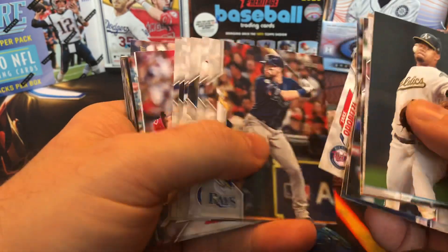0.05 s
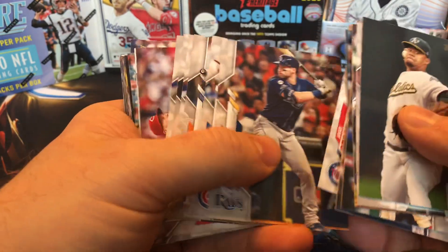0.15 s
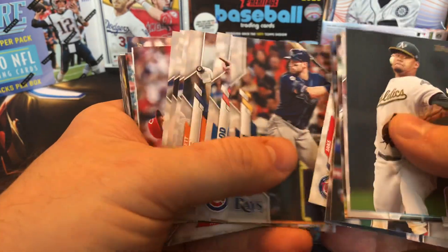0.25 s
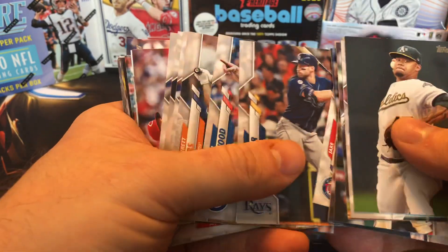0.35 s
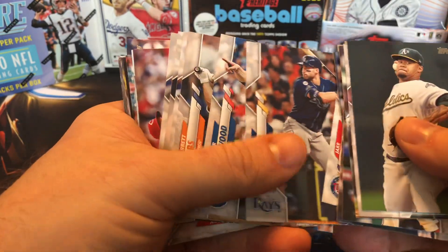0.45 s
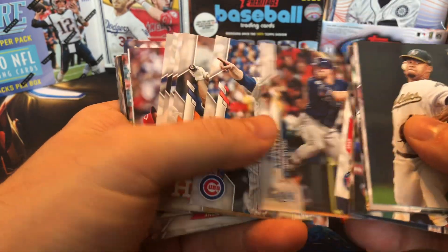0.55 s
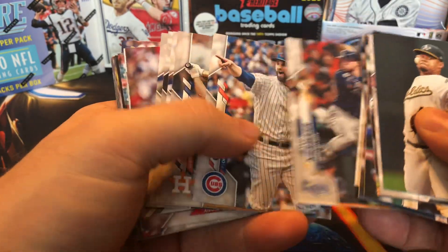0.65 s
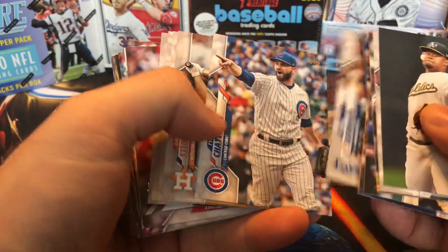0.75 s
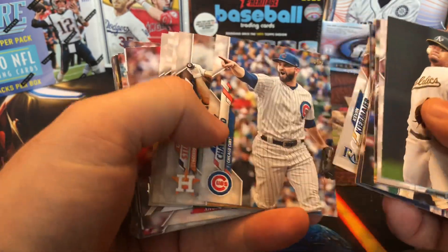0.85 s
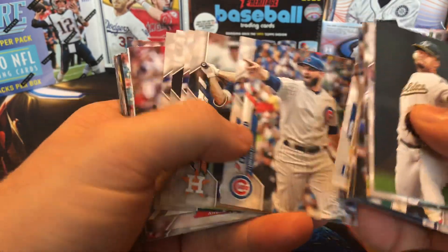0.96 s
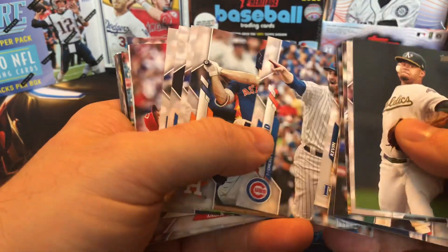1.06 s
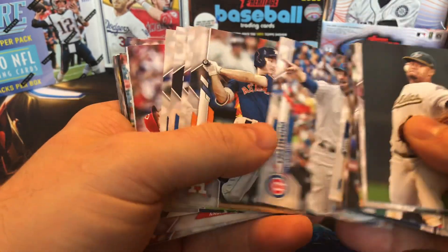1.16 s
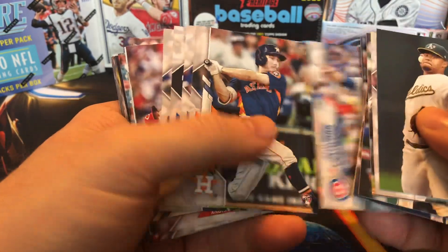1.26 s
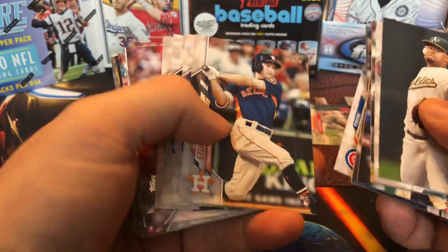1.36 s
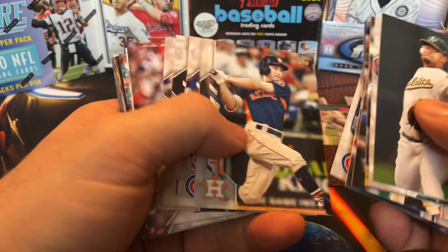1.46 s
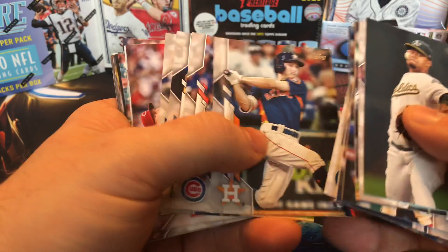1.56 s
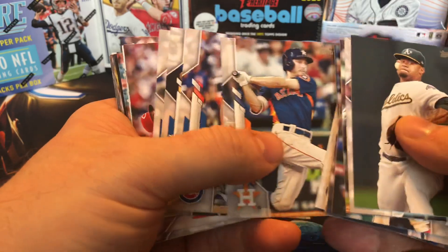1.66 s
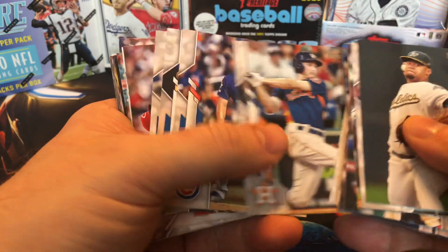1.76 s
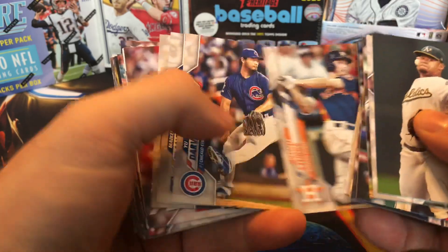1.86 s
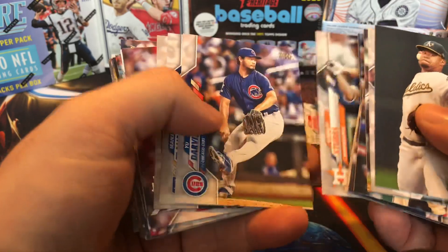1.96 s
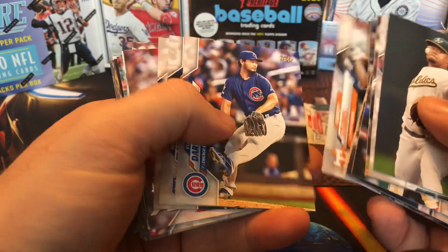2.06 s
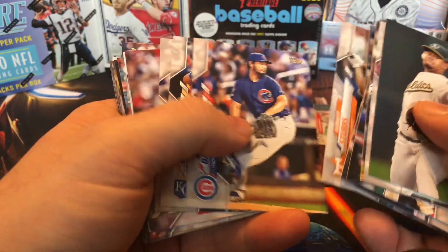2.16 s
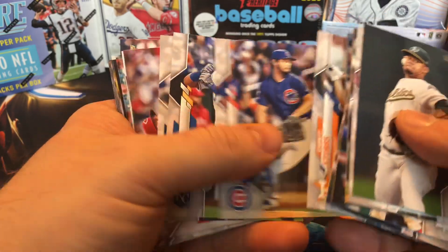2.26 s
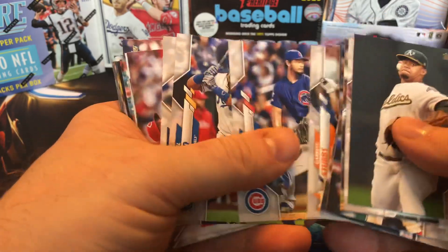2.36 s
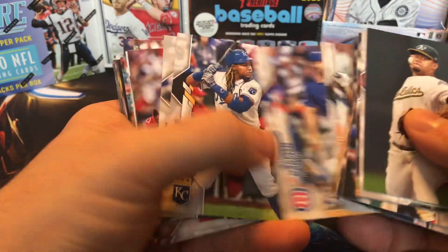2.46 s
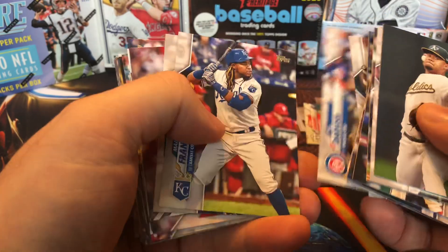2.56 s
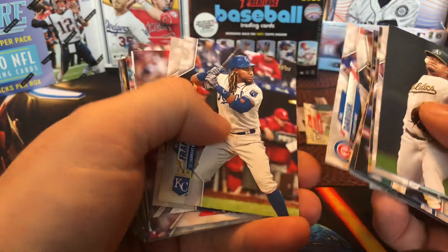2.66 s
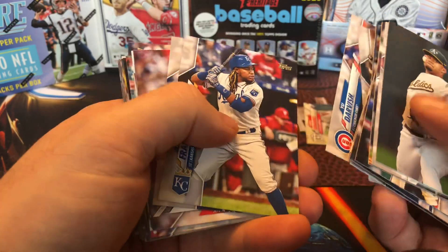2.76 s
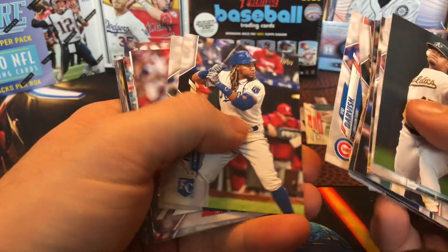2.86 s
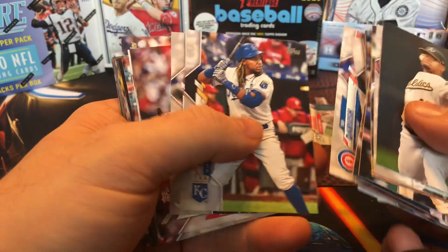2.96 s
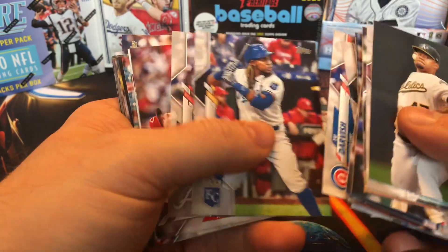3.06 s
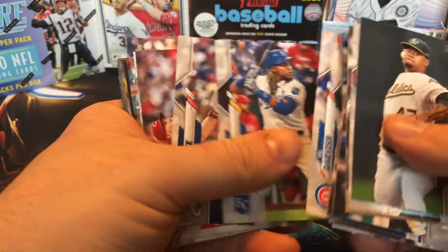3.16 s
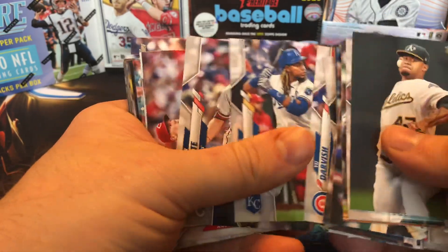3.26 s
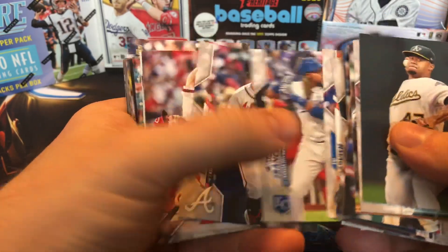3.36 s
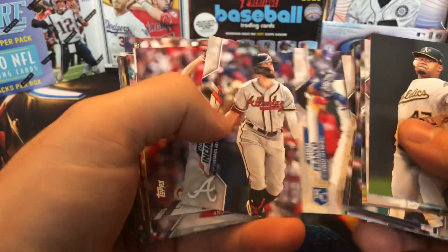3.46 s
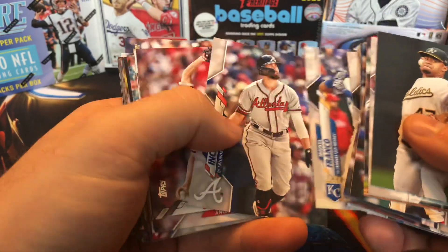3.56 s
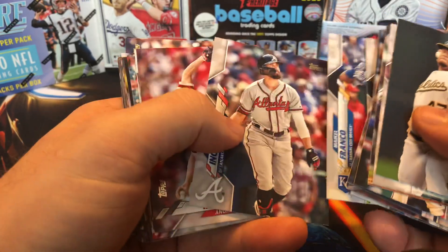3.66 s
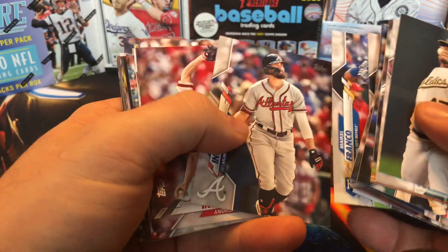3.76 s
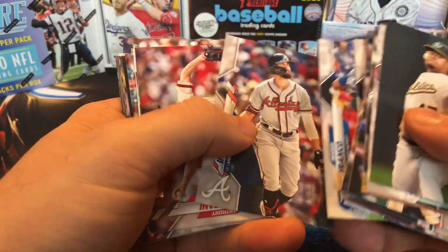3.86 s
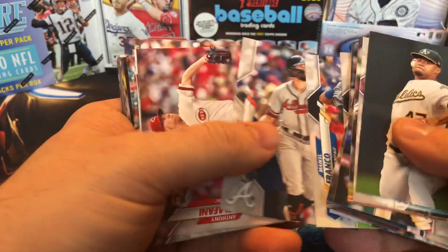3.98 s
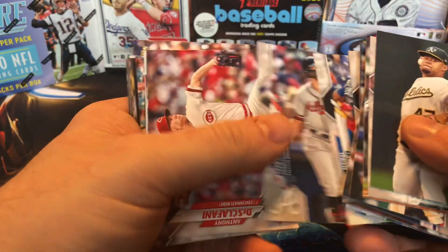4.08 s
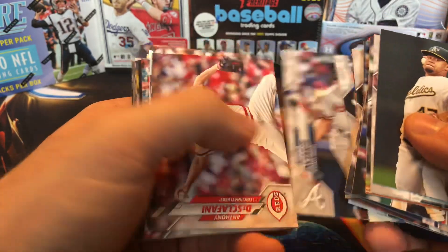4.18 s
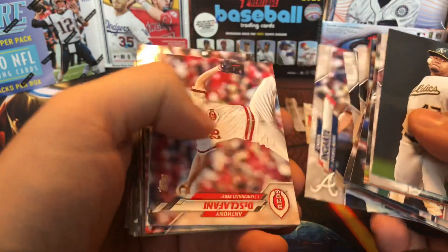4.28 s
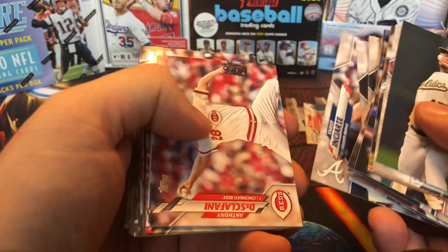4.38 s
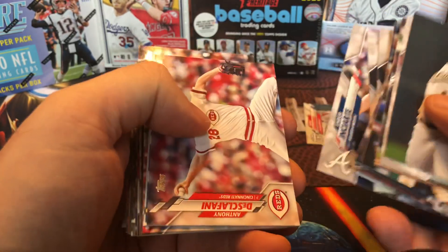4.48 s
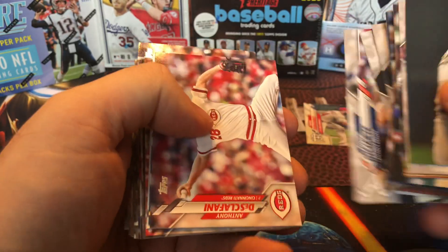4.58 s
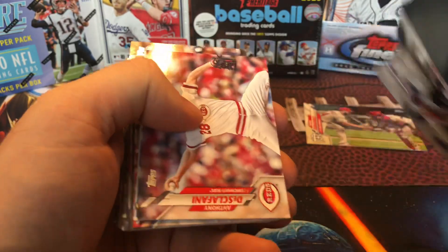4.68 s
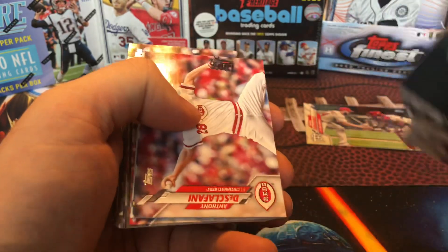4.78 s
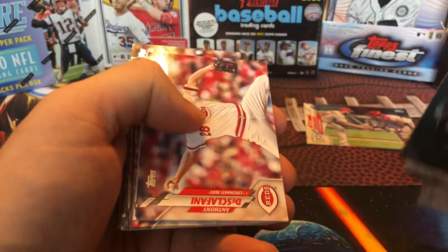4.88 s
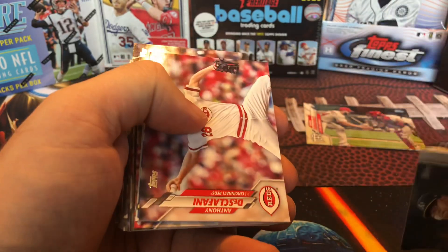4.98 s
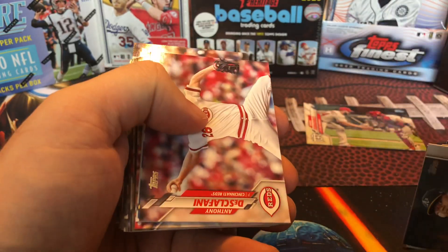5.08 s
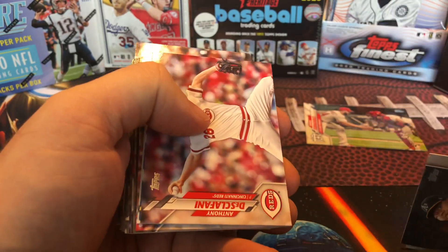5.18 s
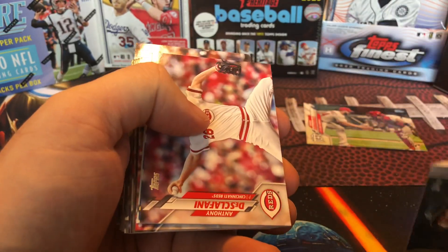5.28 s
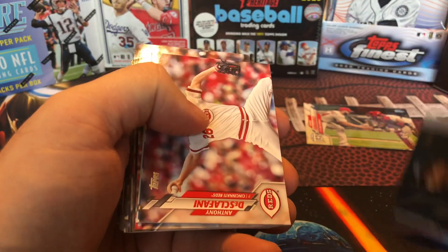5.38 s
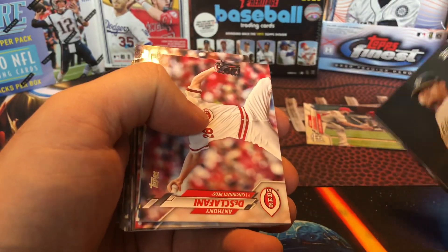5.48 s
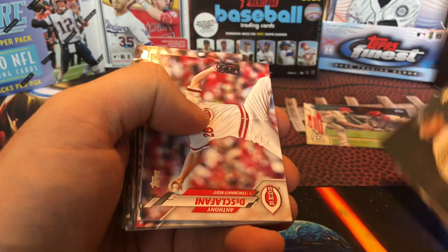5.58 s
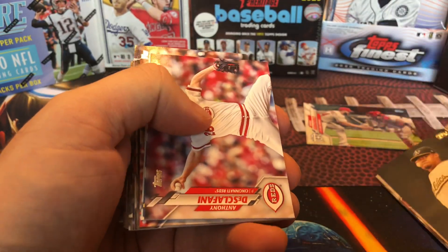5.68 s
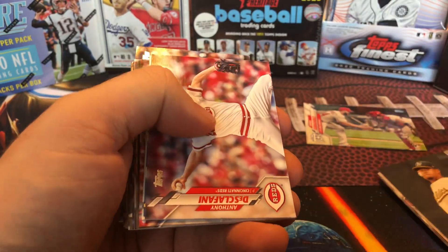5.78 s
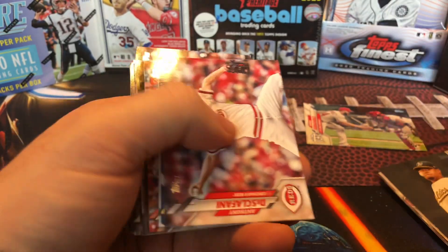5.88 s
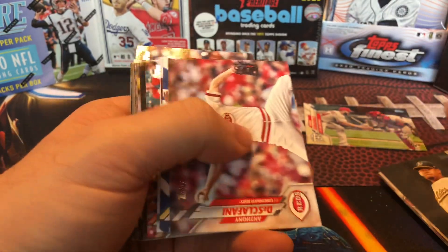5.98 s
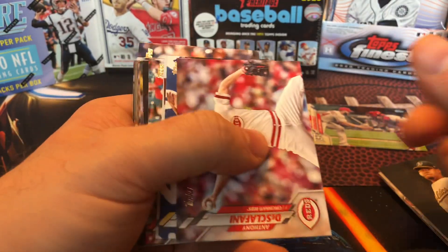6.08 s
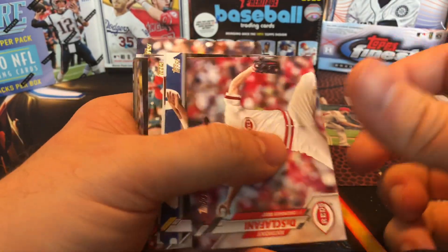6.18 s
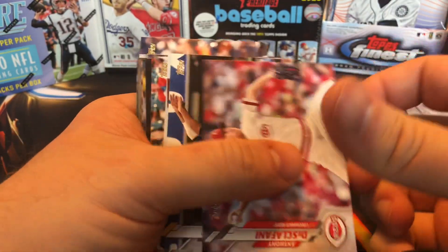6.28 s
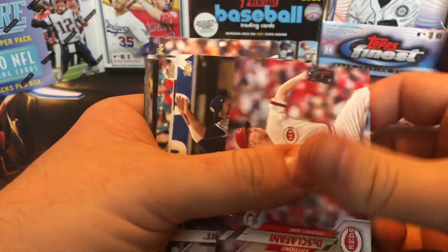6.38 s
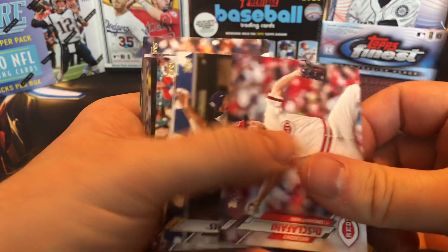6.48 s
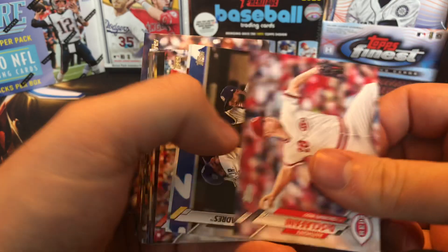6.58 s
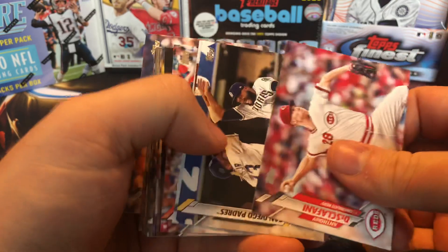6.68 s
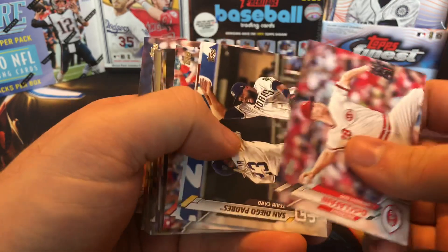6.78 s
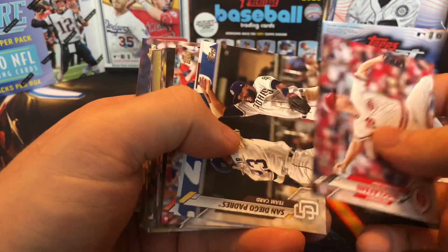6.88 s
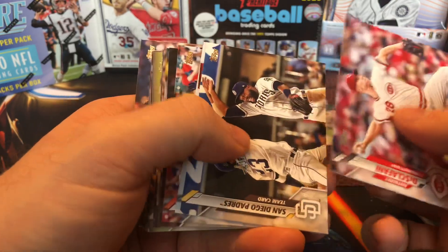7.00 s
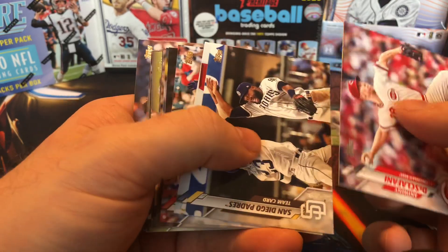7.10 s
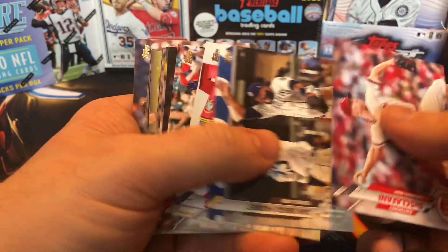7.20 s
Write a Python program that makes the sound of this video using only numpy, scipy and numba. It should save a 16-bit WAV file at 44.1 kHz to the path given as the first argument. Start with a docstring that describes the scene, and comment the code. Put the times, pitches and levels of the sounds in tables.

```python
"""In a quiet room, a stack of stiff glossy cards is thumbed from hand to hand close to a microphone.
Faces slide with a fine hiss and edges scrape: friction noise through band-passes and resonances.
Edges snap free as short noise bursts with a knock, and rubbed gaps whistle as narrow noise bands.
A bundle is laid down and slapped on the table: a falling chirp, a crack and ringing modes.
The walls answer with decaying noise tails; a fan-like hum of noise and tones fills the room."""
import sys
import numpy as np
from scipy import signal
from scipy.fft import rfft, irfft, next_fast_len
from scipy.io import wavfile
from numba import njit

SR = 44100
rng = np.random.default_rng(int(sys.argv[2]) if len(sys.argv) > 2 else 0)


def transcribe(u):
    """Save the signal u as a 16-bit wav file named by the first command-line argument.

    u: samples, shape (n,) or (channels, n), limited to [-1, 1]; the rate is SR.
    q: integer samples, one column per channel.
    """
    v = np.clip(np.atleast_2d(u).T, -1, 1)
    q = np.round(v * 32767).astype(np.int16)
    wavfile.write(sys.argv[1], SR, q)


N = 319284   # length [samples]


def amp(db):
    """Decibel law: amplitude gain of a level in dB."""
    return 10 ** (np.asarray(db) / 20)


def unit(x):
    """Normalisation by energy: scaled to rms 1."""
    return x / np.sqrt(np.mean(x ** 2) + 1e-20)


def peak_one(x):
    """Normalisation by peak: scaled to height 1."""
    return x / np.max(np.abs(x))


def add(out, start_s, sound):
    """Superposition: mixes a sound in at its start time."""
    i = round(start_s * SR)
    out[i:i + len(sound)] += sound[:N - i]


def coloured(x, spectrum):
    """Linear filtering: a gain curve read on a log-frequency axis shapes the spectrum."""
    hz, db = np.transpose(spectrum)
    size = next_fast_len(N)
    log_hz = np.log(np.maximum(np.arange(size // 2 + 1) * SR / size, 1))
    gain = amp(np.interp(log_hz, np.log(hz), db))
    return irfft(rfft(x, size) * gain, size)[:N]


def resonance(x, hz, width_hz):
    """Damped resonance: a two-pole peak of gain 1."""
    r = np.exp(-np.pi * width_hz / SR)
    zeros = [(1 - r * r) / 2, 0, (r * r - 1) / 2]
    poles = [1, -2 * r * np.cos(2 * np.pi * hz / SR), r * r]
    return signal.lfilter(zeros, poles, x)


@njit
def moving_peak(x, hz, damping, sr):
    """Variable resonance: a state-variable band-pass whose centre moves."""
    out, low, band = np.zeros(len(x)), 0., 0.
    for i in range(len(x)):
        g = np.tan(np.pi * hz[i] / sr)
        high = (x[i] - (g + damping) * band - low) / (1 + g * (g + damping))
        mid = g * high + band
        band = g * high + mid
        low += 2 * g * mid
        out[i] = damping * mid
    return out


def drift(rate_hz):
    """Random fluctuation: twice low-passed noise of rms 1."""
    r = np.exp(-2 * np.pi * rate_hz / SR)
    return unit(signal.lfilter([1], [1, -2 * r, r * r], rng.standard_normal(N + SR))[SR:])


def treble(x):
    """High-pass filtering: what lies above the card's own colour."""
    return signal.sosfilt(signal.butter(2, 7500, "high", fs=SR, output="sos"), x)


def low_pass(x, hz):
    """First-order roll-off: softens a sound above the given frequency."""
    return signal.lfilter(*signal.butter(1, hz, fs=SR), x)


def snap(noise, decay_ms, rise_ms):
    """Sudden release: noise that bursts at once and dies exponentially."""
    ms = 1000 * np.arange(len(noise)) / SR
    return noise * (1 - np.exp(-ms / rise_ms)) * np.exp(-ms / decay_ms)


def reach(hz, centre_hz, db_per_octave):
    """Modal excitation: a contact drives most the modes near its own pitch."""
    return amp(-db_per_octave * abs(np.log2(hz / centre_hz)))


# room noise: (frequency [Hz], relative level [dB per Hz])
AIR_SPECTRUM = [(25, -34), (48, -17), (84, -17), (112, -15.5), (140, -8), (190, -10), (290, -6.5),
                (430, -15), (677, -17), (840, -22.5), (1160, -18.5), (1450, -22.5), (1700, -30.5),
                (2500, -32), (4250, -38), (16000, -49)]
AIR_DB = -54   # rms
# wavering tones and room resonances: (frequency [Hz], width [Hz], rms level [dB])
FAN_TONES = [(53.3, 1.6, -85), (100, 2.5, -70.5), (141.6, 18, -63.5), (174.3, 31, -60.5),
             (211.3, 22.5, -57.5), (218.2, 4.3, -55), (257, 39, -63.5), (361, 1.7, -67), (345, 30, -63),
             (400, 2.9, -67.5), (417, 2, -66.5), (1126, 0.41, -70.5)]
# motor tones: (frequency [Hz], rms level [dB])
MOTOR_TONES = [(59.5, -70), (119.8, -58.5)]


def hum(patchy_db=0.5, waver_db=0.5):
    """Broadband and tonal noise: air noise, a motor's tones and narrow noise bands that waver as a fan."""
    air_noise = unit(coloured(rng.standard_normal(N), AIR_SPECTRUM))
    out = amp(AIR_DB + patchy_db * drift(43.0)) * air_noise
    for hz, width_hz, db in FAN_TONES:
        white = rng.standard_normal(N + SR)   # the first second lets the resonance settle
        band = resonance(resonance(white, hz, width_hz), hz, width_hz)
        out += amp(db) * unit(band[SR:])
    t = np.arange(N) / SR
    for hz, db in MOTOR_TONES:
        out += amp(db + waver_db * drift(1.2)) * np.sqrt(2) * np.sin(2 * np.pi * hz * t)
    return out


# colour given to the rubbing noise: (frequency [Hz], gain [dB])
RUB_COLOUR = [(500, 14.5), (900, 8), (1500, 9), (2500, 7.5), (4300, 6.5), (6300, 7.5), (9000, -1),
              (16000, -7.5)]
CATCHES_PER_S, CATCH_DB = 200, -5   # tiny ticks as grit catches, over the rub


def friction(grain_db, patchy_db, patch_rate_hz):
    """Stick-slip friction: surface noise through many small gaps, each opening and closing by itself."""
    catches = (rng.random(N) < CATCHES_PER_S / SR) * amp(CATCH_DB + 2.9 * rng.standard_normal(N))
    held = np.exp(-2 / (SR / 1000))   # each catch dies with a time constant of 0.5 ms
    roughness = amp(grain_db * drift(150.0)) + signal.lfilter([1], [1, -held], catches)
    white = rng.standard_normal((2, N)) * roughness
    out = np.zeros(N)
    for k, hz in enumerate(np.geomspace(600, 15500, 32)):
        out += amp(patchy_db * drift(patch_rate_hz)) * resonance(white[k % 2], hz, 0.11 * hz)
    return coloured(out, RUB_COLOUR)


# a card face is pushed across its neighbour:
# (time of top speed [s], rise [s], fall [s], rub level [dB], centre [Hz], gloss hiss level [dB])
PUSHES = [(0.02, 0.11, 0.19, -62, 4170, -69), (0.24, 0.063, 0.18, -61.5, 3630, -75),
          (0.59, 0.29, 0.12, -60.5, 3300, -68), (0.76, 0.13, 0.24, -58.5, 3760, -64),
          (1.03, 0.13, 0.58, -60.5, 4630, -65), (1.25, 0.12, 0.23, -52.5, 3060, -59),
          (1.4, .05, 0.17, -77, 2800, -112), (1.553, 0.035, 0.053, -57.5, 3700, -67),
          (1.81, 0.26, 0.34, -58.5, 3340, -66), (1.96, 0.082, 0.087, -58, 3600, -65),
          (2.085, 0.017, 0.017, -59, 5000, -72), (2.28, 0.36, 0.36, -61, 4530, -61),
          (2.46, 0.14, 0.25, -56.5, 3980, -61.5), (2.595, 0.034, 0.06, -61, 4000, -60),
          (2.71, 0.071, 0.022, -63, 3000, -70), (2.93, 0.14, 0.2, -59.5, 3900, -79),
          (3.12, 0.057, 0.24, -62, 5030, -64), (3.3, 0.36, 0.35, -57.5, 4460, -61),
          (3.48, 0.09, 0.11, -50, 2490, -57.5), (3.79, 0.098, 0.12, -64, 4500, -61),
          (3.99, 0.2, 0.17, -57, 3200, -63), (4.129, 0.11, 0.056, -47, 4500, -54),
          (4.166, 0.05, 0.054, -45.5, 2450, -56), (4.26, 0.057, 0.046, -51.5, 3850, -56),
          (4.55, 0.074, 0.27, -66, 3300, -76), (4.675, .04, 0.063, -61, 4200, -70),
          (4.77, 0.091, 0.086, -55, 6370, -57.5), (4.847, 0.03, 0.038, -54.5, 4530, -56),
          (5.39, .03, 0.13, -60, 4000, -68), (5.03, 0.089, 0.071, -50.5, 3780, -54),
          (5.17, 0.033, 0.16, -59.5, 4000, -64), (5.265, 0.045, 0.079, -51.5, 3170, -58),
          (5.6, .05, .06, -64, 6000, -66), (5.346, 0.08, 0.065, -42, 2980, -48),
          (5.53, 0.032, 0.1, -63, 4400, -61), (5.729, 0.13, 0.48, -54.5, 4530, -58.5),
          (6.165, 0.051, 0.064, -60.5, 3500, -72), (6.37, 0.071, 0.059, -61, 5940, -61),
          (6.47, .07, 0.16, -60.5, 4300, -64), (6.62, 0.025, 0.066, -60, 3460, -72),
          (6.858, 0.041, 0.054, -47, 2690, -54), (7.11, 0.028, 0.087, -65, 3940, -75),
          (7.23, 0.1, .1, -59.5, 3900, -69)]
FADE_DB, ROUNDNESS = 20, 0.89   # loss one rise before or one fall after top speed; 1 pointed - 2 round
SAG_OCTAVES_PER_S = 2.8   # the free length grows during a push, so the centre sinks
REST_DB, REST_HZ = -79, 3100   # fingers holding the stack


def slides(broad_db=0.0, damping=1.0):
    """Sliding friction: speed sets the level, the card's free length the centre; the gloss hisses above."""
    t = np.arange(0, N / SR, .002)
    top_s, rise, fall, db, centre_hz, gloss_db = np.transpose(PUSHES)[:, :, None]
    late = t - top_s
    speed_db = -FADE_DB * np.abs(late / np.where(late < 0, rise, fall)) ** ROUNDNESS
    power, rest = amp(db + speed_db) ** 2, amp(REST_DB) ** 2
    total = np.sum(power, axis=0) + rest
    # the loudest push leads the common centre
    octave = np.log2(centre_hz) - SAG_OCTAVES_PER_S * np.clip(late, -rise, fall)
    hz = 2 ** ((np.sum(power * octave, axis=0) + rest * np.log2(REST_HZ)) / total)
    gloss = np.sqrt(np.sum(amp(gloss_db + speed_db) ** 2, axis=0))
    level, hz, gloss = [np.interp(np.arange(N) / SR, t, curve) for curve in (np.sqrt(total), hz, gloss)]
    noise = friction(grain_db=1.5, patchy_db=5.0, patch_rate_hz=10.8)
    rub = unit(moving_peak(noise, hz, damping, SR) + amp(broad_db) * noise)
    return level * rub + gloss * unit(treble(noise))


ROOM_T60_S = 0.59


def room(x, walls, build_s=0.00048):
    """Reverberation: a dense tail of reflections, coloured by the walls, that builds up and dies away."""
    t = np.arange(SR) / SR
    tail = rng.standard_normal(SR) * amp(-60 * t / ROOM_T60_S) * (1 - np.exp(-t / build_s))
    tail = coloured(tail, walls)[:SR]
    return signal.fftconvolve(x, tail / np.sqrt(np.sum(tail ** 2)))[:N]


# what the walls return of the cards: (frequency [Hz], relative gain [dB])
CARD_WALLS = [(100, -18), (500, -3), (1400, 1), (2300, -37), (3500, 1), (4800, 2), (16000, -46)]


def card_echo(cards, level_db):
    """Diffuse reflection: the walls return the sound of the cards."""
    return room(amp(level_db) * cards, CARD_WALLS)


# an edge drags over other edges: (start [s], length [ms], rub rms before the swell [dB], centre [Hz],
# treble rms before the swell [dB], swell [0 flat - 2 peaked])
STROKES = [(0.285, 27, -49.5, 4300, -75, 0.31), (1.08, 26, -43.5, 5800, -53, 2.2),
           (1.203, 13, -49.5, 3320, -74, 0.84), (1.683, 16.3, -43.5, 4640, -81, 0.43),
           (2.339, 31, -50, 6500, -71, 0.54), (2.922, 17.5, -51, 5000, -59, .6),
           (3.191, 87, -47, 6160, -66, 0.044), (3.246, 38, -53, 5530, -64, 1.2),
           (3.826, 28, -57, 3800, -84, 0.32), (3.949, 36, -47.5, 4250, -53.5, 0.35),
           (4.38, 43, -84, 7860, -62.5, 0.45), (4.959, 52, -48.5, 4530, -53.5, 0.38),
           (5.238, 6, -54, 5000, -60, .2), (5.204, 23, -52, 4800, -64, .1),
           (5.318, 66, -46, 2670, -64, 0.59), (5.335, 30.4, -36.5, 3400, -46, 1.5),
           (5.466, 58, -59.5, 5160, -57.5, 0.34), (5.583, 26, -60.5, 7000, -62, 0.44),
           (5.779, 10, -45.5, 4500, -44.5, 0.33), (6.33, 23, -61, 6200, -63, 0.32),
           (6.602, 46, -61.5, 3800, -66, .2), (6.7, 76, -74, 4000, -74, .3),
           (6.76, 170, -64.5, 4000, -65.5, .12)]


def scrapes(spread=0.49, broad_db=0.5):
    """Filtered friction: short rough strokes, each with the colour of its edge."""
    out = np.zeros(N)
    noise = friction(grain_db=3.0, patchy_db=3.0, patch_rate_hz=9.3)
    for start_s, length_ms, db, hz, treble_db, swell in STROKES:
        size = round(length_ms * SR / 1000)
        piece = noise[round(start_s * SR):][:size]
        tone = unit(resonance(piece, hz, spread * hz) + amp(broad_db) * piece)
        stroke = np.sin(np.pi * np.arange(size) / size) ** max(swell, .05)
        add(out, start_s, stroke * (amp(db) * tone + amp(treble_db) * unit(treble(piece))))
    return out


# card body modes: (frequency [Hz], width [Hz], level [dB])
CARD_MODES = [(423, 580, -1.5), (692, 90, 12), (966, 54, 15.5), (1370, 370, 21.5), (1990, 150, -17)]
KNOCK_DB_PER_OCTAVE, KNOCK_LAG_S, KNOCK_SHARPNESS = 14, .0015, 5


def card_knock(t, knock_hz):
    """Modal response: a soft, late contact rings the card body near the knock's pitch."""
    click = np.exp(-((t - KNOCK_LAG_S) * knock_hz * KNOCK_SHARPNESS) ** 2)
    body = np.zeros(len(t))
    for k, (hz, width_hz, db) in enumerate(CARD_MODES):
        gain = (-1) ** k * amp(db) * reach(hz, knock_hz, KNOCK_DB_PER_OCTAVE)
        body += gain * resonance(click, hz, width_hz)
    return peak_one(body)


# an edge catches and snaps free: (time [s], edge peak [dB], centre [Hz], treble peak [dB],
# knock peak [dB], knock [Hz], decay [ms], width [octaves])
EDGE_SNAPS = [(0.288, -52, 4070, -52, -44, 600, 1.3, .4), (0.3078, -48, 3040, -64, -64, 501, 1.2, 0.44),
              (0.5313, -54, 2330, -78, -43, 1230, 1.2, 0.5), (0.802, -49, 4000, -66, -63, 514, 1.2, 1),
              (0.821, -50, 4500, -66, -65, 514, 1.2, .8), (1.0794, -35.5, 5000, -55, -43, 654, 1.3, 1),
              (1.111, -45, 2390, -58, -48, 1120, 1.7, 0.55), (1.204, -42, 3900, -57, -47, 1130, 1.1, 0.31),
              (1.289, -40.5, 3000, -69, -35, 1340, 1.7, 0.68), (1.352, -58, 4800, -66, -70, 1100, 1.2, .6),
              (1.6836, -41.5, 4920, -62, -38, 740, 1.8, 0.35),
              (2.354, -28, 1990, -61, -34, 1430, 1.1, 0.34),
              (2.3606, -37.5, 2090, -62, -45, 1090, 1.3, 0.37), (2.3787, -44, 2200, -66, -45, 638, 1.1, .4),
              (2.393, -43, 3800, -64, -44, 1560, 1, 0.73), (2.477, -46, 3900, -66, -66, 600, .8, 0.46),
              (2.501, -44, 2200, -66, -43, 1100, 0.72, 1.4), (2.585, -45, 3600, -76, -66.5, 500, 1.6, 0.3),
              (2.731, -58, 2380, -58, -64, 1170, 1.1, 0.23), (2.8154, -57, 4470, -55, -75, 560, 1.2, .4),
              (2.9268, -40, 2470, -66, -43.5, 1000, 1, 0.6), (3.168, -55, 3900, -75, -70, 1000, 12, .15),
              (3.1946, -17, 5430, -24, -34.5, 1660, 1.6, 0.64), (3.261, -46, 3200, -55, -58, 1000, 1.2, .7),
              (3.2674, -23, 1750, -36, -32, 810, 1.8, 0.7), (3.287, -36, 1880, -66, -57, 1010, 0.47, 0.86),
              (3.5163, -46, 4470, -52, -50, 746, 1.2, .4), (3.526, -44, 2140, -66, -43, 500, 1.2, 0.34),
              (3.75, -49.5, 3880, -46, -70, 1120, 2.1, 0.2), (3.9635, -35, 1780, -62, -30, 1350, 1.2, 1.1),
              (4.2217, -26.5, 2600, -27, -25, 484, 1.3, 1.36), (4.231, -47, 4000, -54, -47, 600, 2.2, 0.78),
              (4.318, -64, 7000, -59, -66, 1130, 1.7, 0.61),
              (4.4942, -44.5, 1900, -69, -67, 1120, 1.4, 0.34),
              (4.602, -38, 3470, -44, -50, 587, 0.88, 1.1), (4.6593, -54, 5800, -60, -72, 651, 1.2, .4),
              (4.9585, -30.5, 2040, -59, -46, 501, 2.7, 1.3),
              (4.9641, -28.5, 2620, -57, -32, 810, 2.3, 0.45), (5.023, -39, 2110, -64, -47, 950, 1.4, 0.55),
              (5.155, -44.5, 2400, -51, -50, 624, 2, 0.48), (5.204, -44.5, 2600, -57, -45, 1490, 1.2, 0.31),
              (5.238, -42, 4400, -62, -54, 1130, 1.5, .9), (5.267, -49, 3800, -62, -58, 1130, 1.2, .9),
              (5.3462, -49, 3480, -52, -54, 780, 1.2, 0.42),
              (5.466, -49, 4840, -56.5, -75, 1140, 1.3, 0.37), (5.661, -39, 4600, -39, -41, 790, 2.4, 1.1),
              (5.7287, -42.5, 1790, -57, -43, 1100, 1.2, 0.39),
              (5.7805, -41, 4000, -50, -54, 1100, 2.2, .5), (6.332, -45.5, 5900, -56, -47, 638, 1.2, 0.46),
              (6.464, -38, 3100, -66, -52, 1210, 0.25, 1.1), (6.483, -46, 3840, -66, -63, 1130, 1.2, 0.69),
              (6.513, -46, 2200, -62, -47, 1130, .3, 1.2)]
TOP_HZ = 10800   # the treble of a snap falls away above this


def flicks(lag_s=.0005, broad_db=-28.0):
    """Stored elastic energy released: a burst coloured by the free edge, and a knock into the card body."""
    out, t = np.zeros(N), np.arange(SR // 20) / SR
    for time_s, db, hz, treble_db, knock_db, knock_hz, decay_ms, width in EDGE_SNAPS:
        burst = snap(rng.standard_normal(len(t)), decay_ms, rise_ms=0.076)
        push = np.diff(burst, prepend=0)   # a small edge radiates its treble best
        width_hz = np.log(2) * width * hz
        tone = resonance(resonance(push, hz, width_hz), hz, width_hz) + amp(broad_db) * burst
        bright = treble(low_pass(burst, TOP_HZ))
        edge = amp(db) * peak_one(tone) + amp(treble_db) * peak_one(bright)
        add(out, time_s + lag_s, edge + amp(knock_db) * card_knock(t, knock_hz))
    return out


# table modes: (frequency [Hz], level [dB], free t60 [s])
TABLE_MODES = [(65, 5, 0.26), (109.4, 16.5, 0.12), (140.7, 0, 0.31), (187, 6, 0.12), (204, -8, 0.28),
               (288.7, 8, 0.26), (341.7, 1, 0.37), (410.6, 20.5, 0.092), (572, -49, 0.07), (716, -21, 0.11)]


def table_ring(t, centre_hz, lasts, rise_ms, ring_lag_s=0.00497):
    """Modal superposition: decaying sines near the blow's pitch build up together."""
    ring = np.zeros(len(t))
    for hz, db, t60 in TABLE_MODES:
        level = amp(db - 60 * t / t60 / lasts) * reach(hz, centre_hz, db_per_octave=8.0)
        ring += level * np.sin(2 * np.pi * hz * (t - ring_lag_s))
    return ring * (1 - np.exp(-(1000 * t / rise_ms) ** 2))


# resonances of the bundle's slap: (frequency [Hz], width [Hz], level [dB])
CRACK_MODES = [(1750, 250, 14), (2330, 170, 29), (3300, 1200, 31.5), (6450, 870, 25)]
CRACK_DECAY_MS = .5   # of the rattle that drives the resonances


def slap_crack(size, rough=0.25):
    """Impulsive excitation: a flat slap and its rattle drive the bundle's resonances."""
    rattle = snap(rng.standard_normal(size), CRACK_DECAY_MS, rise_ms=0.078)
    burst = rough * rattle + (np.arange(size) == 20)   # one-sample slap
    crack = np.zeros(size)
    for k, (hz, width_hz, db) in enumerate(CRACK_MODES):
        crack += (-1) ** k * amp(db) * resonance(burst, hz, width_hz)
    return peak_one(crack)


# blows on the table: (time [s], thud level before the low-pass [dB], contact low-pass [Hz],
# crack peak [dB], ring gain [dB], centre of the modes reached [Hz], share of free ring time [1],
# ring build-up [ms])
TABLE_BLOWS = [(0.29, -70, 300, -80, -64, 70, 0.87, 23), (1.102, -67, 300, -75, -52, 65, 1, 25),
               (2.368, -61, 298, -65, -45, 60, 0.72, 20), (3.271, -63, 300, -75, -57, 70, 0.9, 22),
               (4.9593, -33, 400, -56, -32, 440, 0.29, 5.4), (4.974, -43, 400, -70, -41.5, 400, 0.42, 6.5),
               (4.991, -37, 400, -63, -32, 383, 0.34, 7.7), (5.004, -33, 500, -60, -42, 300, 0.99, 14),
               (5.071, -55, 400, -75, -47, 400, 0.82, 19), (5.366, -55, 300, -75, -47.5, 110, 0.76, 13),
               (5.656, -31.5, 1500, -33.5, -29.5, 119, 0.53, 20.5),
               (5.8019, -10.5, 4970, -9, -21, 246, 0.71, 27), (5.877, -58, 300, -83, -43, 170, 0.81, 14)]


def blows(start_hz=1660.0, travel_s=0.00391, top_s=0.0044, wide_s=0.0026, early=0.57):
    """Dispersion: a crack, then bending waves that arrive treble first; the table top rings on."""
    out, t = np.zeros(N), np.arange(SR // 2) / SR
    cycles = start_hz * travel_s * t / (t + travel_s)   # pitch falls as 1 / time squared
    swell = np.exp(-((t - top_s) / wide_s) ** 2) + early * np.exp(-t / top_s)
    thud = np.sin(2 * np.pi * cycles) * swell
    for time_s, db, contact_hz, crack_db, ring_db, centre_hz, lasts, rise_ms in TABLE_BLOWS:
        blow = amp(db) * low_pass(thud, contact_hz)
        blow += amp(crack_db) * slap_crack(len(t))
        blow += amp(ring_db) * table_ring(t, centre_hz, lasts, rise_ms)
        add(out, time_s, blow)
    return out


# what the walls return of a blow: (frequency [Hz], relative gain [dB])
BLOW_WALLS = [(59, -42), (100, -5), (250, -4.5), (480, -6.5), (1000, -9.5), (1600, -15.5), (2100, -30),
              (3400, -25.5), (4800, -35.5), (7450, -38), (16000, -71)]


def slap_echo(level_db):
    """Impulse response: one soft click for each blow sets off the tail of the room."""
    out = np.zeros(N)
    for time_s, db, contact_hz, *_ in TABLE_BLOWS:
        click = low_pass(signal.unit_impulse(SR // 20), contact_hz)
        add(out, time_s, amp(db + level_db) * click)
    return room(out, BLOW_WALLS)


# a gap between two cards sings as it is rubbed:
# (start [s], length [ms], rms before the swell [dB], centre at start [Hz], centre at end [Hz])
SINGING_GAPS = [(2.21, 19, -61, 4100, 4300), (2.44, 21, -63, 8200, 9100), (5.205, 22, -64, 3840, 5000),
                (5.255, 60, -61, 2620, 3000), (5.308, 81, -45.5, 2600, 2700), (6.338, 36, -65, 5800, 5800),
                (6.345, 25, -67, 6800, 7200), (6.78, 60, -76, 7200, 6600)]


def whistles(damping=0.04):
    """Cavity resonance: narrow bands of rubbing noise that may glide."""
    out = np.zeros(N)
    for start_s, length_ms, db, start_hz, end_hz in SINGING_GAPS:
        size = round(length_ms * SR / 1000)
        glide_hz = np.geomspace(start_hz, end_hz, size)
        tone = moving_peak(rng.standard_normal(size), glide_hz, damping, SR)
        swell = np.sin(np.pi * np.arange(size) / size) ** .5
        add(out, start_s, amp(db) * unit(tone) * swell)
    return out


def scene():
    """Superposition: the cards and the table with their echoes, and the hum."""
    cards = slides() + scrapes() + flicks() + whistles()
    table = blows() + slap_echo(level_db=11.5)
    return (hum() + cards + card_echo(cards, level_db=-22.5) + table)[None]


MIC_CUT_HZ, CUTOFF_HZ = 41, 16600


def record(dry):
    """Band limiting: the microphone drops the deepest bass; the top is cut."""
    thin = signal.sosfilt(signal.butter(3, MIC_CUT_HZ, "high", fs=SR, output="sos"), dry)
    return signal.sosfilt(signal.cheby2(12, 60, CUTOFF_HZ, fs=SR, output="sos"), thin)


dry = scene()
out = record(dry)
transcribe(out)
```